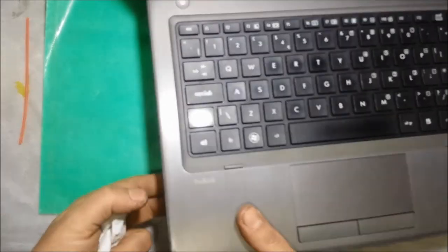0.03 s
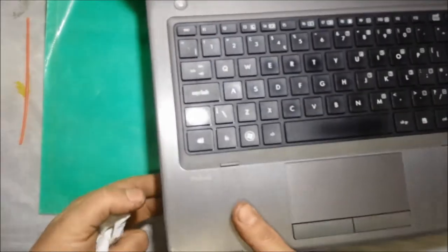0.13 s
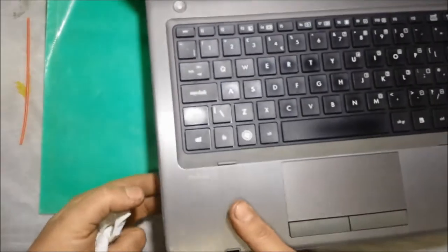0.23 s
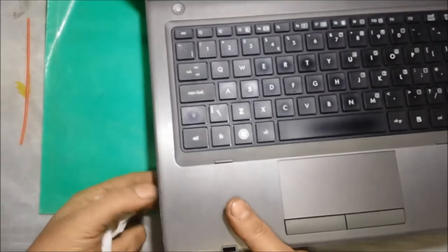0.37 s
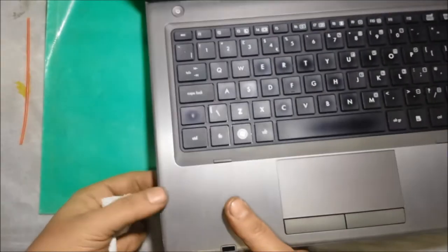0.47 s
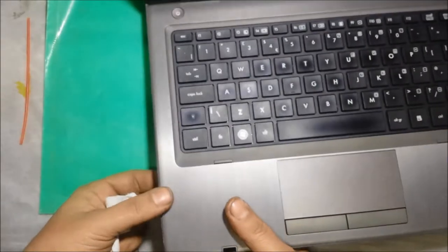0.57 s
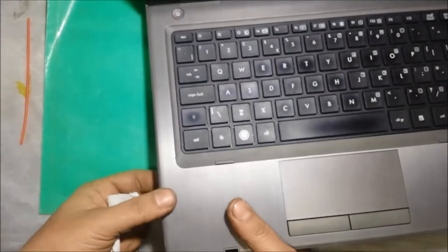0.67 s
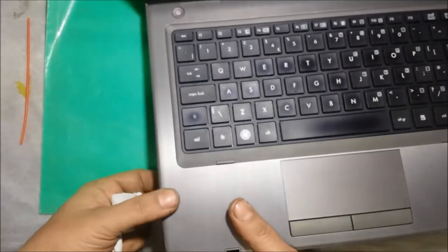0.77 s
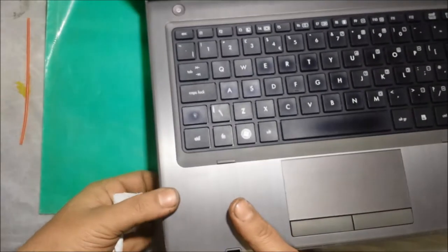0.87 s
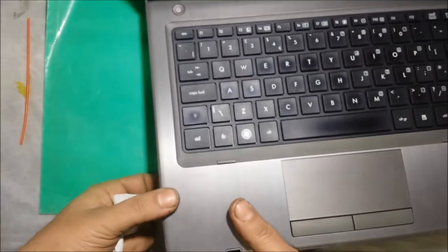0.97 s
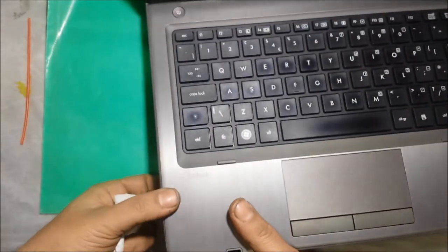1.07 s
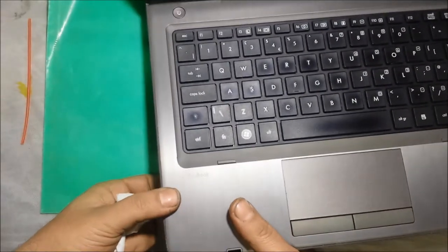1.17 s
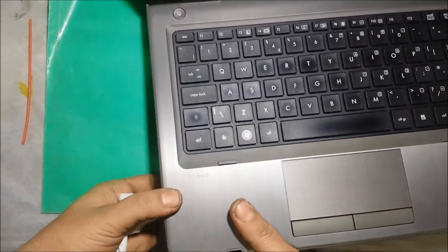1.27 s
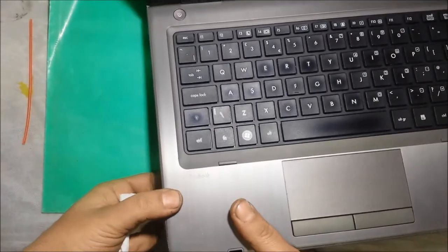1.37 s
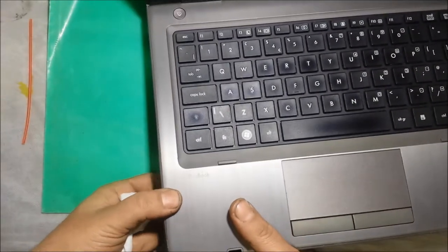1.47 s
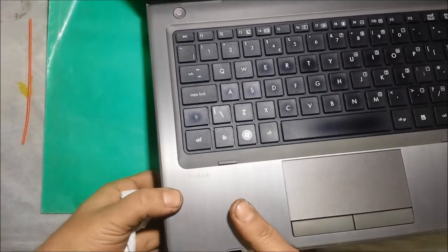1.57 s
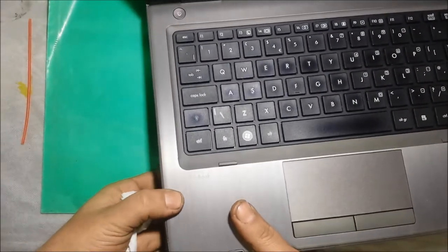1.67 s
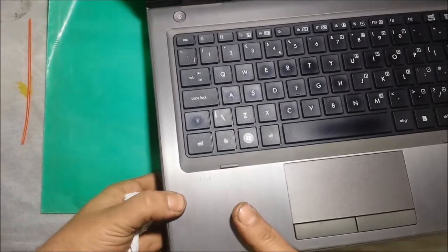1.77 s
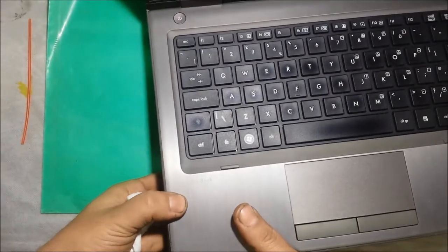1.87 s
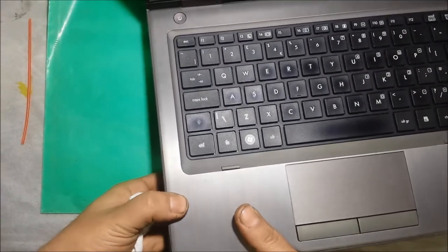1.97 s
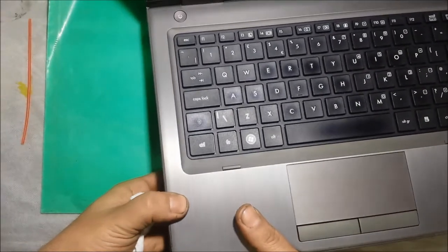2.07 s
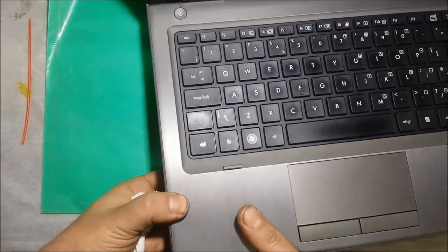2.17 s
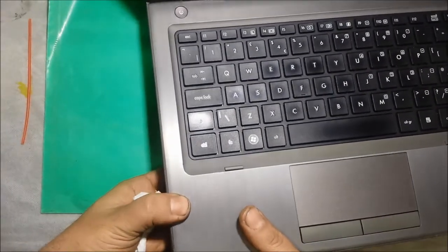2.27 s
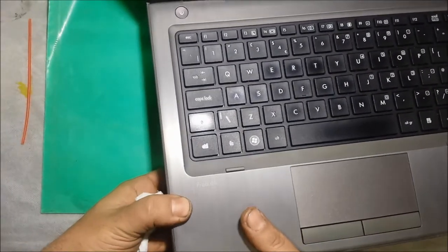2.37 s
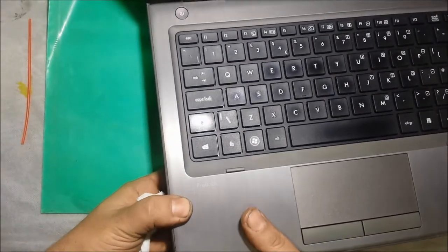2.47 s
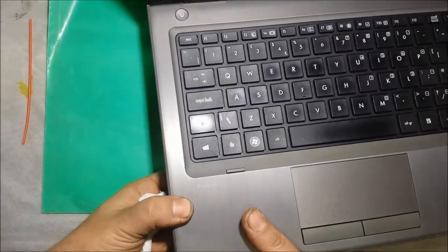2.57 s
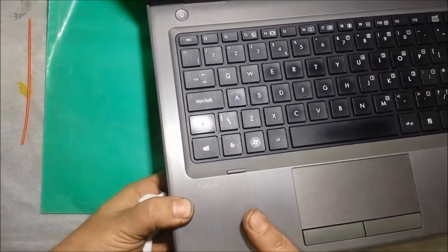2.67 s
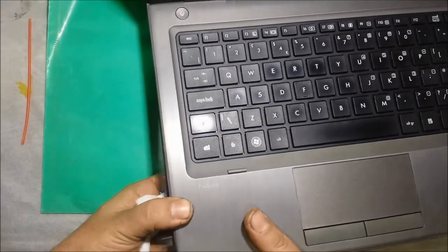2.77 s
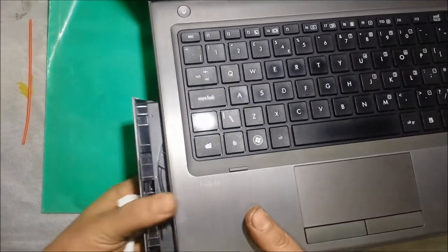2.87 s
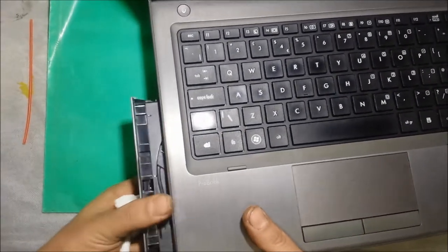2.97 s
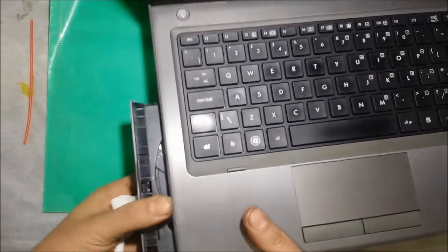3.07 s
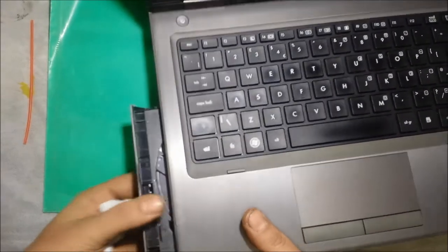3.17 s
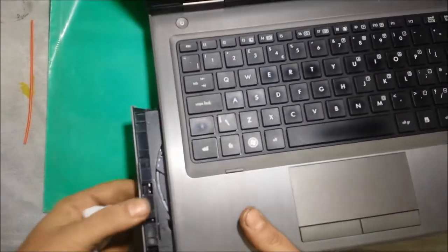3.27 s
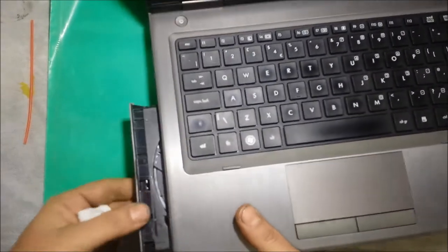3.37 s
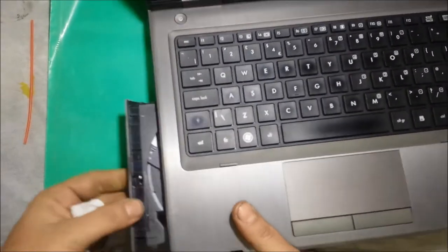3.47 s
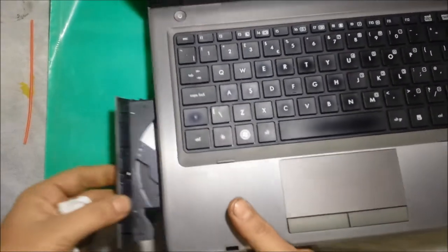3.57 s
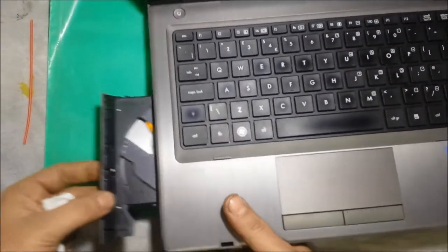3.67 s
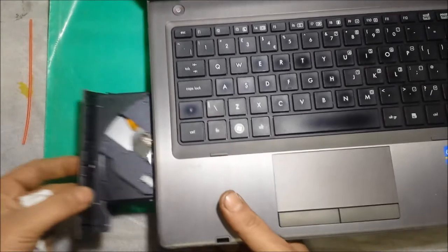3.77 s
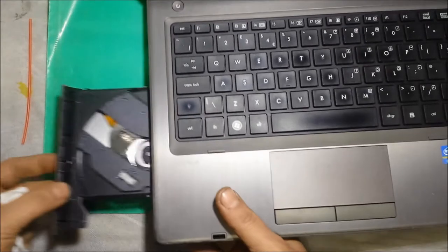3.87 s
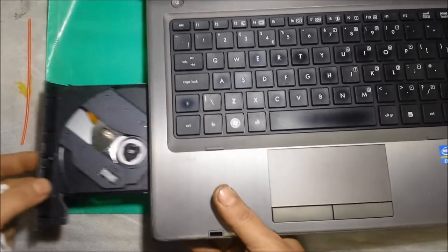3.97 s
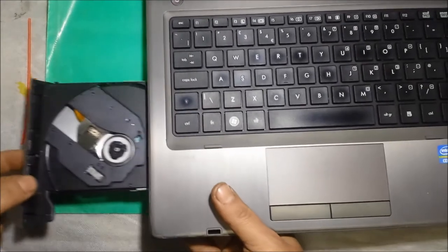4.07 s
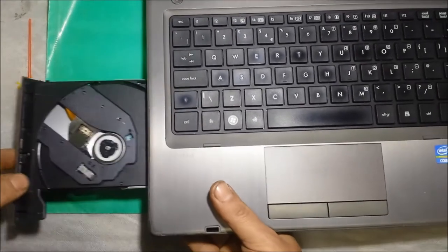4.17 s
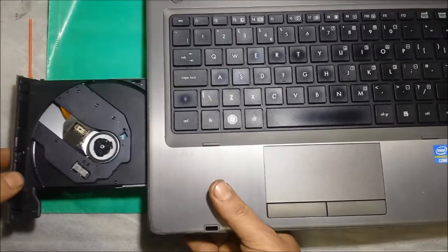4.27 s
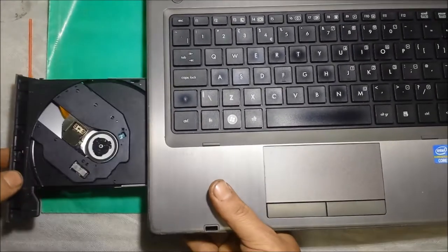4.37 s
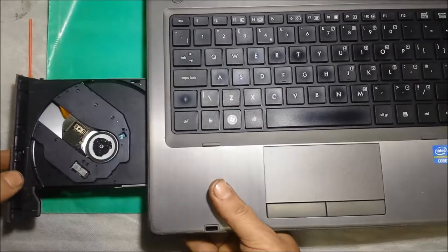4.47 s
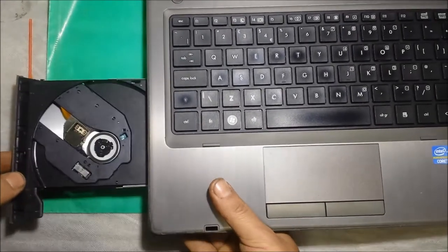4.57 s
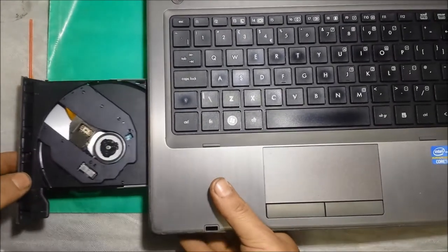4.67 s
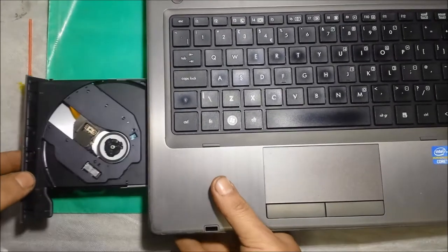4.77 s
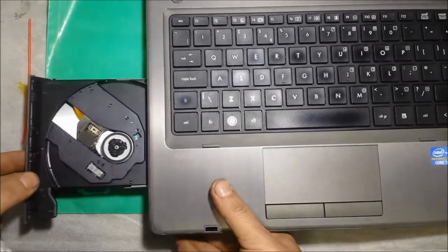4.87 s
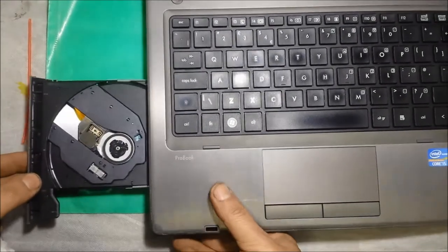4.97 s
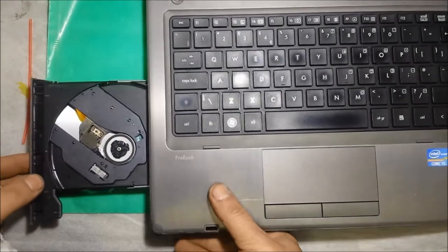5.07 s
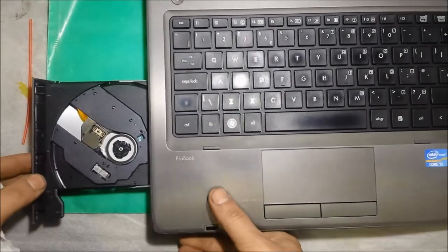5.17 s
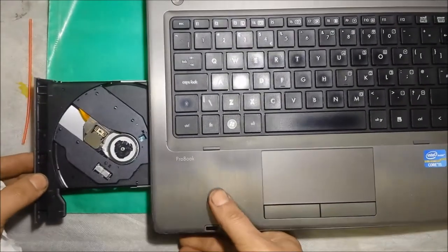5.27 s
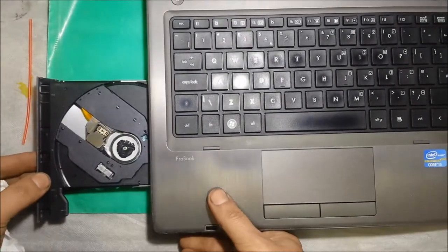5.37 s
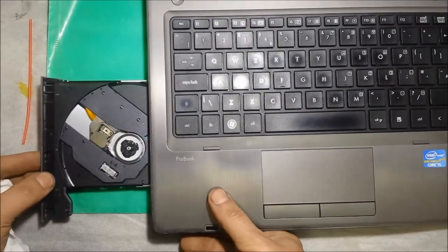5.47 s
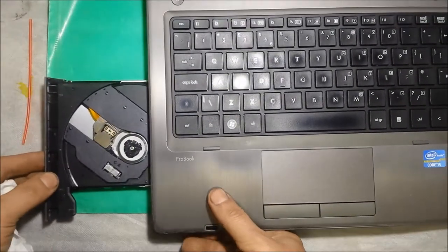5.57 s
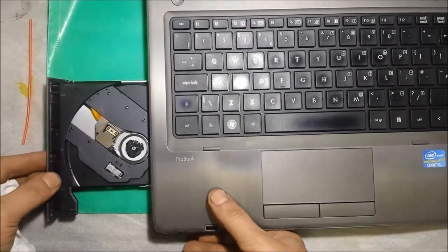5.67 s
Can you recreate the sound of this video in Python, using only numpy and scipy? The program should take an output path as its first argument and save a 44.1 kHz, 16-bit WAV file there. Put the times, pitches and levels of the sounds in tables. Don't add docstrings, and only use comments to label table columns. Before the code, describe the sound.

Sharp snap, then a loud double clack as a laptop drive opens; its tray scrapes outward and clicks twice, with soft tissue rustle and rising rumble.

```python
import sys
import numpy as np
from scipy import signal
from scipy.io import wavfile
from scipy.ndimage import uniform_filter1d

SR = 44100
rng = np.random.default_rng(int(sys.argv[2]) if len(sys.argv) > 2 else 0)


def ratio_of_db(decibels):
    return 10 ** (np.asarray(decibels, float) / 20)


def waveform_to_disk(signal):
    frames = np.transpose(np.atleast_2d(signal))
    scaled = np.clip(frames, -1, 1) * 32767
    samples = np.round(scaled).astype(np.int16)
    wavfile.write(sys.argv[1], SR, samples)


N = 252693
HZ = np.fft.rfftfreq(4096, 1 / SR)


def evened(x):
    return x / np.sqrt(np.mean(x ** 2) + 1e-20)


def read(points, hz):
    f, value = np.transpose(points)
    return np.interp(np.log(hz + 1), np.log(f + 1), value)


def curves(rows):
    s, *columns = np.transpose(rows)
    return [np.interp(np.arange(N) / SR, s, c) for c in columns]


def bumps(rows):
    t = np.arange(N) / SR
    total = 0
    for s, height, rise, fall in rows:
        total = total + height * np.exp(-((t - s) / np.where(t < s, rise, fall)) ** 2)
    return total


def causal(db, size=2048):
    log = np.log(ratio_of_db(np.maximum(db, -100)))
    circle = np.concatenate([log, log[-2:0:-1]])
    return np.fft.ifft(np.exp(np.conj(signal.hilbert(circle)))).real[:size]


def coloured(x, points):
    return signal.oaconvolve(x, causal(read(points, HZ)))[:len(x)]


def resonate(x, hz, width):
    turn = np.exp(2j * np.pi * np.cumsum(hz * np.ones(len(x))) / SR)
    r = np.exp(-np.pi * width / SR)
    return 2 * (turn * signal.lfilter([1 - r], [1, -r], x / turn)).real


def grains(count, per_s, spread_db):
    hit = rng.random(count) < per_s / SR
    size = rng.exponential(1, count)
    return evened(hit * ratio_of_db(spread_db * np.minimum(size, 4)) * rng.standard_normal(count))


def wander(per_s):
    t = np.arange(0, N, 64) / SR
    drift = sum(np.sin(2 * np.pi * (f * t + rng.random())) / np.sqrt(f)
                for f in np.geomspace(per_s / 10, per_s, 20))
    return np.interp(np.arange(N) / SR, t, evened(drift))


def stirred(base_db, follow, stir):
    # start_s, level_db
    swell = [
        (0, -71.5),
        (.9, -73),
        (2.4, -71),
        (3.3, -66),
        (4.0, -61),
        (4.58, -62),
        (4.82, -59),
        (5.19, -55),
        (5.52, -50),
        (5.73, -50.5),
    ]
    # peak_s, level_db, rise_s, fall_s
    stirs = [
        (.22, 8, 0.094, 0.12),
        (.92, 7, 0.13, 0.14),
        (1.61, 5.5, .2, 0.19),
        (3.06, 9.5, 0.1, 0.23),
        (4.12, 9.5, .25, 0.2),
    ]
    quiet_db = -71
    return base_db + follow * (curves(swell)[0] - quiet_db) + stir * bumps(stirs)


def diffuse(db, patchy_db):
    # pitch_hz, likeness (-1 to 1)
    alike = [(60, 0.86), (180, 0.85), (550, 0.55), (1650, 0.09), (4970, -0.01), (15000, -0.01)]
    frames, hz = N // 512 + 5, np.fft.rfftfreq(2048, 1 / SR)
    a, b, c, d, patches = rng.standard_normal((frames, 1025, 5)).T
    patches = uniform_filter1d(patches, size=9, axis=0)
    patches = evened(uniform_filter1d(patches, size=8, axis=1))
    same = np.clip(read(alike, hz), -1, 1)[:, None]
    left = a + 1j * b
    right = same * left + np.sqrt(1 - same ** 2) * (c + 1j * d)
    gain = ratio_of_db(np.interp(hz, HZ, db)[:, None] + patchy_db * patches)
    z = np.array([left, right]) * gain
    return evened(signal.istft(z, nperseg=2048, noverlap=1536)[1][:, :N])


def ambience():
    # pitch_hz, level_db (per Hz)
    rumble_tone = [(20, -36), (42, -33), (55, -4), (120, -1), (300, -12.5), (700, -13.5), (1500, -25.5),
                   (2200, -18), (3200, -25), (6000, -39)]
    # pitch_hz, width_hz, level_db
    booms = [(58.4, 15, 1.5), (76, 11, 1.5), (121, 10, 5), (157, 10.3, -4), (243, 12, 0), (306, 13, 4.5)]
    # pitch_hz, level_db (per Hz)
    air_tone = [(180, -33), (300, -5), (350, -4), (372, -8.5), (680, -10.5), (793, -18.5), (884, -14),
                (4270, -26.5), (6470, -20.5), (12000, -34), (15600, -59), (22000, -120)]
    rumble_db = stirred(-71, follow=0.96, stir=0.46) + 2.5
    air_db = stirred(-77, follow=0.88, stir=0.76) + 7.5
    boom = sum(ratio_of_db(db) / (1 + (2 * (HZ - hz) / width) ** 2) for hz, width, db in booms)
    rumble = diffuse(read(rumble_tone, HZ) + 10 * np.log10(.15 + boom), patchy_db=2.5)
    whir = []
    for _ in range(2):
        whir_hz = 2060 * (1 + 0.04 * wander(4.9))
        whir.append(evened(resonate(rng.standard_normal(N), whir_hz, 220)))
    air = diffuse(read(air_tone, HZ), patchy_db=2.5)
    return ratio_of_db(rumble_db) * (rumble + ratio_of_db(-17) * np.array(whir)) + ratio_of_db(air_db) * air


def shell(x, detune=1.0):
    # pitch_hz, width_hz, level_db
    modes = [(301.7, 120, -8.5), (447, 180, -9.5), (661, 53, 5), (924, 220, -6), (1144, 170, -2),
             (1435, 450, -4), (1960, 280, -8), (2380, 110, -11.5)]
    return sum((-1) ** k * ratio_of_db(db) * resonate(x, hz * detune, width)
               for k, (hz, width, db) in enumerate(modes))


def struck(x, force, db):
    return ratio_of_db(db) * x * np.linalg.norm(force) / (np.linalg.norm(x) + 1e-12)


def contacts(rows, per_s, spread_db, rise_ms):
    # pitch_hz, level_db (per Hz)
    crack_tone = [(900, -36.5), (1700, -3.5), (2500, -5.5), (3500, -6), (4600, -5), (5600, -5), (7000, 1),
                  (8500, -7.5), (10500, -18.5), (13500, -21), (15000, -29.5), (16500, -51.5)]
    out, t = np.zeros(N + 6000), np.arange(6000) / SR
    for s, db, shell_db, decay_ms, hard_db in rows:
        blow = np.minimum(1000 * t / rise_ms, 1) * np.exp(-1000 * t / max(decay_ms, .1))
        settle = min(decay_ms / 3, 1) * (1 - np.exp(-t / .002)) * np.exp(-1000 * t / 17)
        force = blow + ratio_of_db(-17.5) * settle
        drive = force * grains(6000, per_s, spread_db)
        tone = [(hz, level + hard_db * np.log2(hz / 5000)) for hz, level in crack_tone]
        crack = coloured(drive, tone)
        ring = shell(drive, rng.uniform(0.94, 1.05))
        sound = struck(crack, force, db) + struck(ring, force, db + shell_db + 0.5)
        out[round(s * SR):][:6000] += ratio_of_db(-5) * sound
    return out[:N]


def snaps():
    # start_s, level_db, shell_ring_db, hardness_db (per octave), decay_ms
    hits = [(0.0816, -6.5, -20.5, 2.5, 3.8), (0.0878, -18.5, -11, -3, 5.9), (0.092, -18, -11, -7, 2.2),
            (1.014, -37, 0.3, -3.5, 3.1), (1.4424, -44.5, 4.5, 1, 2.5), (2.7163, -42.5, 5, -1, 3.9),
            (2.8693, 1, -12, 3.7, 2.46), (2.8712, -18, -4.5, -10, 2), (2.8767, -7.5, -5, -1, 3.1),
            (2.8837, -11, -6, 1, 2.4), (2.8912, -4, -13, 5, 2.66), (2.8969, -12, -11, -4.5, 3.1),
            (3.0767, -40, -9, -2, 1.8), (3.1925, -35, -10, -3.5, 7.6), (3.86, -30, -8, -2.5, 3.8),
            (4.0299, -12, -17, -3, 2.7), (4.073, -10.5, -21, 1.5, 2.33), (5.4291, -42, 1.1, -1, 4.8)]
    rows = [(s, db, ring_db, ms, hard_db) for s, db, ring_db, hard_db, ms in hits]
    return contacts(rows, per_s=28000, spread_db=1.5, rise_ms=0.55)


def ringing(rows):
    out, t = np.zeros(N + SR), np.arange(SR) / SR
    for s, db, hz, t60 in rows:
        tone = np.sin(2 * np.pi * hz * t) * (1 - np.exp(-t / 0.0013))
        out[round(s * SR):][:SR] += ratio_of_db(db - 60 * t / t60) * tone
    return out[:N]


def knocks():
    return ringing([(0.083, -30.5, 1080, .05), (.09, -39, 675, 0.083), (2.875, -33.5, 399, 0.14),
                    (.715, -65, 743, 0.18), (.85, -61.5, 750, 0.11), (1.534, -55, 1730, 0.02),
                    (3.075, -42.5, 1190, 0.028), (3.215, -49.5, 436, 0.13), (3.228, -41, 7500, 0.033),
                    (3.325, -49, 1290, 0.027), (3.1, -37, 4470, .06), (4.03, -26, 3140, 0.037),
                    (4.074, -28, 4870, .03), (4.074, -20, 6870, 0.043), (3.989, -54, 1670, 0.13),
                    (4.505, -53, 500, 0.22), (4.974, -43.5, 705, 0.033), (5.424, -43.5, 231, 0.37)])


def spring():
    # pitch_hz, level_db, t60_s
    tones = [(622, -1.5, 0.79), (1482, -19, 1), (1857, -11, 0.59), (2330, -11, .23)]
    return ringing([(.09, db - 46.5, hz, t60) for hz, db, t60 in tones])


def thuds():
    # start_s, level_db
    hits = [(.092, -59), (1.025, -47.5), (1.207, -55), (1.228, -51), (1.415, -58), (1.442, -52),
            (2.717, -59.5), (2.872, -44), (2.878, -44.5), (2.891, -36.5), (2.897, -32), (2.932, -47),
            (3.0, -53.5), (3.095, -47), (3.86, -55), (4.074, -52), (5.43, -39)]
    out, t = np.zeros(N + 6000), np.arange(6000) / SR
    hz, t60_s, lag_s = 122, .085, .014
    table = np.sin(2 * np.pi * hz * t) + 0.39 * np.sin(2 * np.pi * 1.2 * hz * t)
    thud = table * ratio_of_db(-60 * t / t60_s) * (1 - np.exp(-t / lag_s))
    for s, db in hits:
        out[round(s * SR):][:6000] += ratio_of_db(db) * thud / thud.max()
    return out[:N]


def ticks():
    # start_s, level_db
    hits = [
        (0.175, -36),
        (0.8172, -42),
        (1.459, -42),
        (2.1, -42),
        (2.731, -40),
        (3.3723, -40.5),
        (4.3478, -32),
        (4.6552, -36),
        (4.9776, -37),
        (5.2974, -42),
    ]
    rows = [(s, db, -23, 0.48, 5.5) for s, db in hits]
    return contacts(rows, per_s=86000, spread_db=2, rise_ms=.1)


def rustle():
    # peak_s, level_db, rise_s, fall_s
    squeezes = [
        (1.02, -63.5, 0.01, 0.022),
        (2.41, -75.5, 0.042, 0.088),
        (2.75, -77, 0.043, 0.043),
        (4.77, -55.5, 0.082, 0.19),
        (5.27, -66, 0.043, 0.047),
    ]
    # pitch_hz, level_db (per Hz)
    tissue = [(1200, -37.5), (2400, -15.5), (3200, -7), (4800, -5.5), (5600, -6.5), (6800, 0.5), (8500, -6),
              (10500, -14), (16000, -26.5)]
    held = np.interp(np.arange(N) / SR, [0.31 - .3, 0.31 + 0.25], [.4, 1])
    force = ratio_of_db(-73) * held + bumps([(s, ratio_of_db(db), rise, fall) for s, db, rise, fall in squeezes])
    fibres = grains(N, per_s=14000, spread_db=1.5) * ratio_of_db(.8 * wander(20))
    return force * evened(coloured(fibres, tissue))


def drags():
    # start_s, catches (count), peak_db, shell_ring_db, decay_ms
    strokes = [(1.022, 2, -39.5, -6, 4.5), (1.183, 2, -56.5, 11.5, 8.8), (1.212, 3, -50.5, 13.5, 5),
               (1.238, 1, -53, 3.5, 8.9), (1.389, 1, -56, 13.5, 2.8), (1.4149, 2, -47.5, 10, 3),
               (1.451, 1, -50.5, -18, 4.9), (1.5344, 1, -58.5, 13, 3.2), (2.9324, 2, -38.5, 0.5, 6.6),
               (2.9994, 1, -42.5, -9, 5.4), (3.0881, 1, -36.5, -9, 10), (3.0976, 2, -24.5, -16, 5),
               (3.116, 1, -37, -0.5, 4), (3.2043, 1, -46, -8, 23), (3.2281, 1, -44.5, -8, 11),
               (3.2594, 1, -49, -5, 10), (3.8836, 1, -33, -24.5, 9.4), (3.9422, 1, -32.5, -36, 41)]
    catch_s, ends_db, hard_db = 0.0089, -6, 0.3
    rows = []
    for s, n, db, shell_db, ms in strokes:
        for k in range(round(n)):
            arch_db = ends_db * ((2 * k + 1) / round(n) - 1) ** 2
            rows.append((s + k * catch_s, db + arch_db, shell_db, ms, hard_db))
    return contacts(rows, per_s=5000, spread_db=4, rise_ms=2.7)


def slide():
    # start_s, friction_db
    pulls = [
        [(3.48, -68), (3.632, -56.5), (3.726, -48.5), (3.845, -48), (3.875, -45.5), (3.92, -39), (4.0, -47),
         (4.02, -43)],
        [(4.1, -44), (4.17, -44), (4.344, -53.5), (4.4, -67)],
    ]
    # pitch_hz, level_db (per Hz)
    rail = [(400, -17.5), (800, -11), (1600, -2), (3000, -5), (4600, -7), (5800, -3.5), (7000, -2),
            (9000, -12), (12000, -17), (16000, -21)]
    # peak_s, half_length_s, level_db
    squeals = [
        (3.63, .05, 5),
        (3.886, 0.021, 25),
        (3.94, 0.018, 22.5),
        (4.34, .04, 6),
    ]
    # peak_s, half_length_s, level_db
    sings = [
        (3.717, 0.021, 16),
        (4.046, 0.079, 16),
    ]
    # peak_s, half_length_s, level_db
    rubs = [
        (3.875, 0.011, -72),
        (3.933, 0.037, -57.5),
        (4.31, 0.038, -56),
    ]
    rows = [*pulls[0], *pulls[1]]
    db = curves(rows)[0]
    start, end = rows[0][0], rows[-1][0]
    moving = np.interp(np.arange(N) / SR, [start - .05, start, end, end + 0.025], [0, 1, 1, 0])
    slips = grains(N, per_s=12000, spread_db=-0.5) * ratio_of_db(0.96 * wander(90))
    hiss = evened(coloured(slips, rail))
    bind_db = bumps([(s, more_db, half, half) for s, half, more_db in squeals])
    squeak = evened(resonate(resonate(slips, 4700, 700), 4700, 700))
    squeak = squeak * ratio_of_db(-21 + bind_db + 3.3 * wander(60))
    sing_db = bumps([(s, more_db, half, half) for s, half, more_db in sings])
    edge_gain = ratio_of_db(-20 + sing_db + 3.1 * wander(24.96))
    edge = edge_gain * evened(resonate(slips, 6850 * (1 + 0.011 * wander(21)), 400))
    lean = ratio_of_db(db - 44) + bumps([(s, ratio_of_db(rub_db), half, half) for s, half, rub_db in rubs])
    body = lean * evened(shell(slips, 1 + 0.11 * wander(9.5)))
    return moving * (ratio_of_db(db) * (hiss + squeak + edge) + body)


def laptop():
    return snaps() + thuds() + ticks() + rustle() + drags() + slide()


def echoes(start, decay):
    # pitch_hz, t60_s
    room = [(100, .2), (600, .25), (2000, 0.24), (7000, 0.21), (15000, 0.26)]
    taps = np.zeros((2, SR // 2))
    at = np.arange(start, SR // 2 - 20, 20)
    at = at + rng.integers(0, 20, (2, len(at)))
    np.put_along_axis(taps, at, rng.choice([-1., 1.], at.shape), 1)
    hz, t, z = signal.stft(taps, SR, nperseg=128)
    fade = ratio_of_db(-60 * t / (decay * read(room, hz))[:, None])
    tail = signal.istft(z * fade, SR, nperseg=128)[1]
    return tail / np.linalg.norm(tail[0])


def scene():
    right, other = laptop(), laptop()
    bass = signal.butter(2, 2000, fs=SR, output="sos")
    left = other + signal.sosfiltfilt(bass, right - other)
    direct = np.array([np.roll(left, 4), right])
    turn = np.pi * np.arange(N) / SR / .7
    treble = signal.sosfilt(signal.butter(1, 800, "high", fs=SR, output="sos"), direct)
    room = 0
    for k in range(3):
        part = treble * np.cos(turn + np.pi * k / 3)
        room = room + signal.oaconvolve(part, echoes(start=150, decay=1.3), axes=1)
    return direct + knocks() + spring() + ratio_of_db(-19.5) * room[:, :N] + ambience()


def band_limit(x):
    return signal.sosfilt(signal.butter(12, 16640, fs=SR, output="sos"), x)


def record(dry):
    # pitch_hz, left_minus_right_db
    shadow = [(60, 0), (1300, 1.5), (2800, 2), (4400, -12), (6000, -15), (7100, -46), (9000, -31),
              (11500, -20), (16000, -6.5)]
    shadow_db = read(shadow, HZ)
    right_db = 10 * np.log10(4 / (1 + ratio_of_db(shadow_db) ** 2)) - 4.5
    cavity_db = 0.5 / (1 + (2 * (HZ - 6380) / 380) ** 2)
    ports = np.array([causal(right_db + shadow_db), causal(right_db + cavity_db)])
    hiss_db = stirred(-76.5, follow=.42, stir=.7) + 5.5
    hiss = ratio_of_db(hiss_db) * rng.standard_normal(dry.shape)
    heard = signal.oaconvolve(dry, ports, axes=1)[:, :N] + hiss
    ceiling = .86
    heard = heard / (1 + (heard / ceiling) ** 4) ** .25
    edge = signal.firwin(1023, 15720, window=("kaiser", 8), fs=SR)
    return band_limit(signal.oaconvolve(heard, edge[None], "same", axes=1))


dry = scene()
out = record(dry)
waveform_to_disk(out)
```